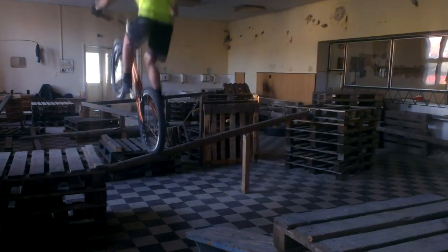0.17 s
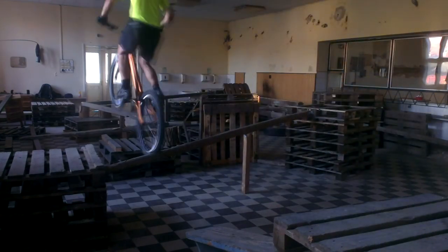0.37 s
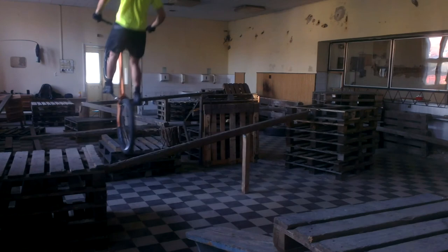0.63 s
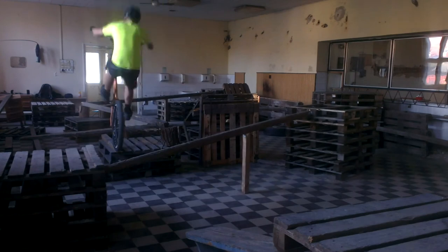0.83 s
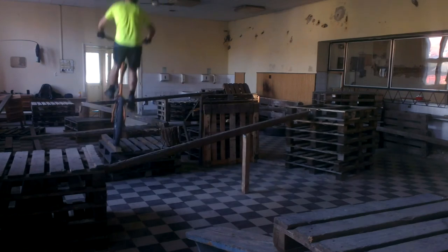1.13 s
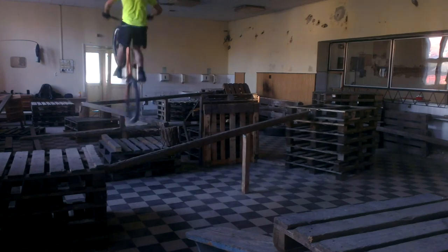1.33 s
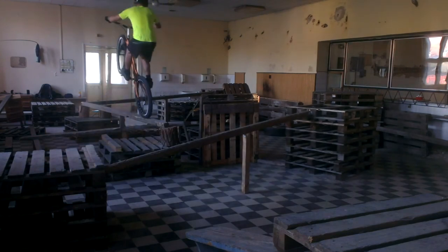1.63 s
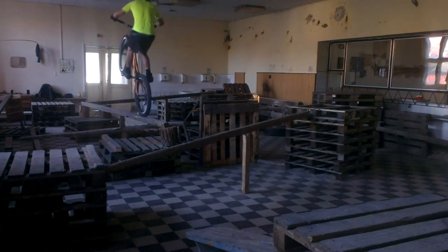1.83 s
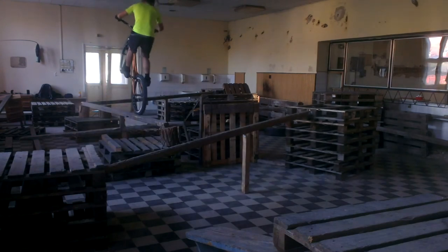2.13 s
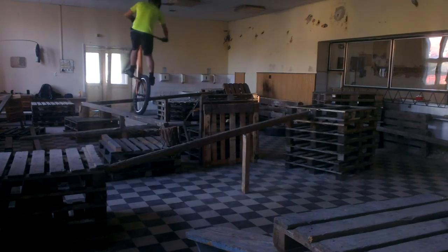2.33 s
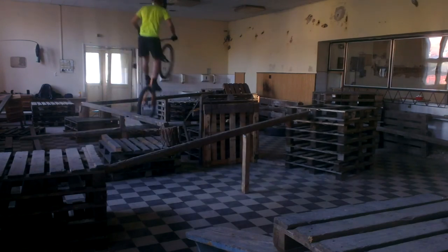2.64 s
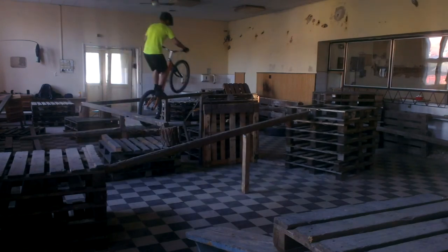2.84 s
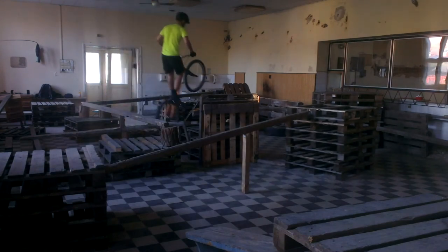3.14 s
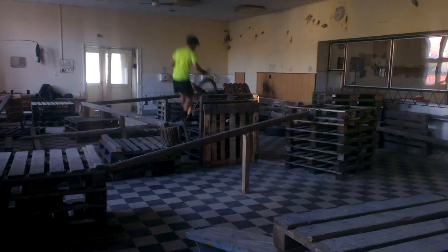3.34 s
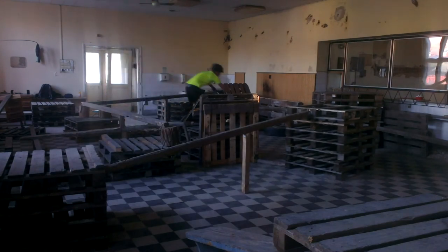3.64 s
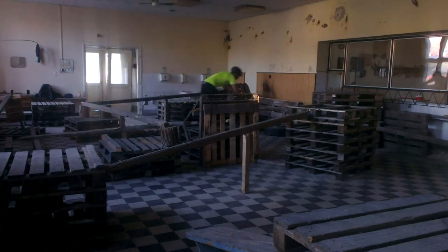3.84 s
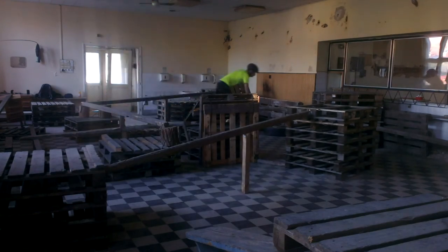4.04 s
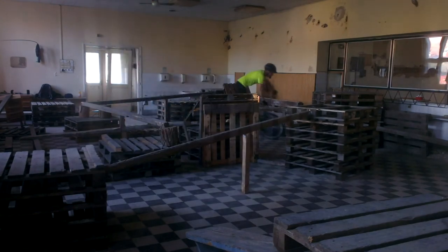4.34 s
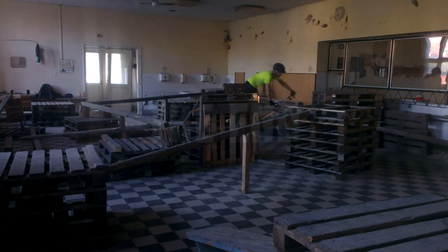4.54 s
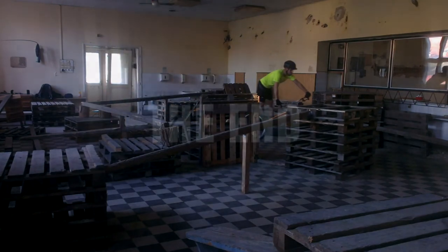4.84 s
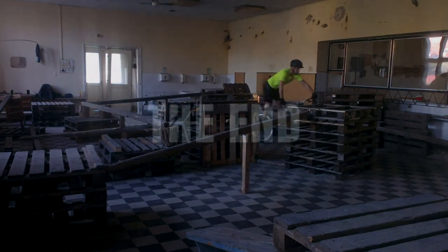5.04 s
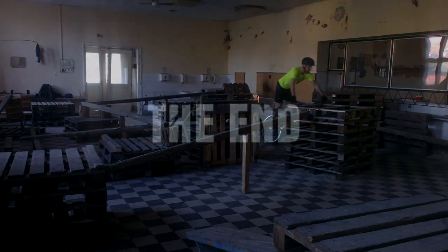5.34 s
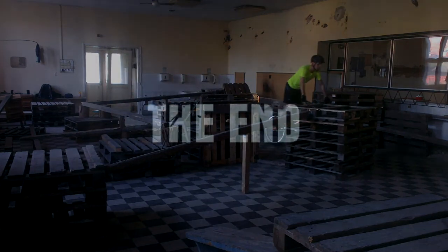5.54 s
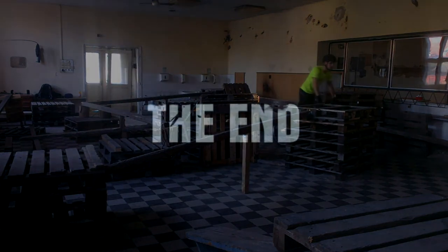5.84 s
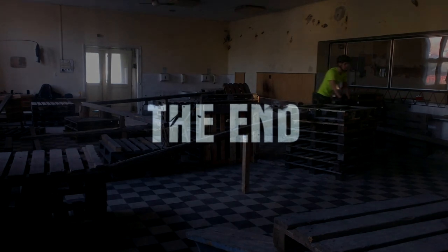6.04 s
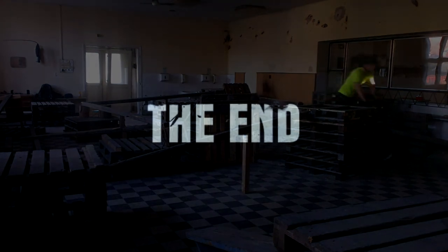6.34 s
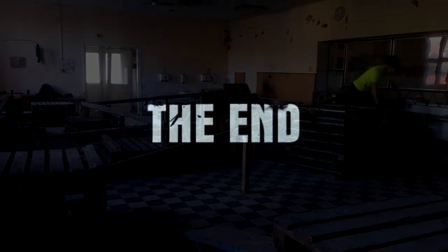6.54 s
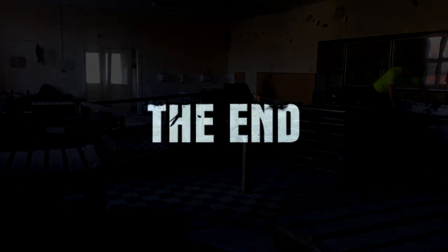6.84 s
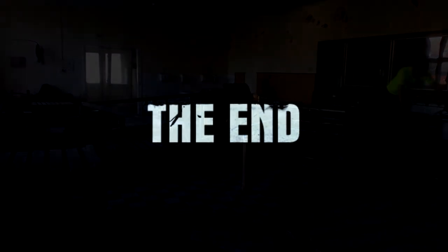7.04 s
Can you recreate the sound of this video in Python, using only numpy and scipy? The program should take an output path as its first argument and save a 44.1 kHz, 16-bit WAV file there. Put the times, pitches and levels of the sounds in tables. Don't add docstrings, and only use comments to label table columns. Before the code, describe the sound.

In a reverberant empty hall, a hopping bicycle gives brief brake shrieks, tyre thuds on planks, metallic ticks and faint freewheel buzz before quiet.

```python
import sys
import numpy as np
from scipy import signal
from scipy.fft import rfft, irfft, next_fast_len
from scipy.io import wavfile
from scipy.ndimage import uniform_filter1d

SR = 44100
rng = np.random.default_rng(int(sys.argv[2]) if len(sys.argv) > 2 else 0)


def dump(signal):
    limited = np.clip(np.atleast_2d(signal).T, -1, 1)
    pcm = np.round(limited * 32767).astype(np.int16)
    wavfile.write(sys.argv[1], SR, pcm)


def gain_from_db(level_db):
    decades = np.asarray(level_db, float) / 20
    return 10 ** decades


N = 317075


def at_hz(points, hz):
    table_hz, values = np.transpose(points)
    return np.interp(np.log(hz + 1), np.log(table_hz), values)


def drift(rate_hz, count):
    r = np.exp(-2 * np.pi * rate_hz / SR)
    slow = signal.lfilter([1], [1, -2 * r, r * r], rng.standard_normal(count + 4000))[4000:]
    return slow / slow.std()


def colour(x, spectrum):
    count = x.shape[-1]
    size = next_fast_len(count)
    gain = gain_from_db(at_hz(spectrum, np.fft.rfftfreq(size, 1 / SR)))
    return irfft(rfft(x, size) * gain, size)[..., :count]


def band_pass(x, low_hz, high_hz):
    return signal.sosfilt(signal.butter(2, [low_hz, high_hz], "band", fs=SR, output="sos"), x)


def split(x, hz):
    return [signal.sosfilt(signal.butter(4, hz, kind, fs=SR, output="sos"), x) for kind in ("low", "high")]


def evened(x, low_hz, high_hz, over_s):
    band = band_pass(x, low_hz, high_hz)
    power = (band.mean(axis=0) ** 2 + (band ** 2).mean(axis=0) / 2) / 2
    power = uniform_filter1d(power, int(over_s * SR))
    power = uniform_filter1d(power, int(over_s * SR / 2))
    return x / np.sqrt(np.maximum(power, 0) + 1e-9 * power.max())


def swell(clock, start, peak_db, rise_s, stop, fall_db_s):
    since = np.maximum(clock - start, 0)
    edge = np.clip(since / .004, 0, 1)
    rise_db = -24 * np.exp(-since / rise_s)
    return edge * gain_from_db(peak_db + rise_db - fall_db_s * np.maximum(clock - stop, 0))


# start_s, cut_db, over_s
TURN_DOWNS = [
    (.99, 6.5, 0.036),
    (1.8, 9, 0.025),
    (2.343, 12.5, 0.045),
    (3.51, 5, 0.014),
    (4.36, 14.5, 0.12),
]


def ducked(clock, start):
    cuts = [cut_db * np.clip((clock - s) / over_s, 0, 1) for s, cut_db, over_s in TURN_DOWNS if s > start]
    return gain_from_db(-sum(cuts))


# pitch_hz, fall_by_60_db_s
RING_TIME = [(200, 1.8), (1000, 1.2), (3000, 1.6), (6000, 0.94), (10000, 0.41), (15000, 0.086)]
# pitch_hz, likeness (0 to 1)
LIKENESS = [(200, 0.74), (700, 0.45), (1500, 0.067), (5000, .15), (12000, 0.31)]
# pitch_hz, left_over_right_db
LEFT_LEAN = [(500, 1.65), (4000, -.5), (8000, 0), (15000, 16)]


def hall(stretch, direct_db):
    t = np.arange(SR * 3 // 2) / SR
    edges = 120 * 2 ** np.arange(0, 7.1, .5)
    white = rng.standard_normal((2, 2, len(t)))
    bands, decays = [], []
    for k, (low, high) in enumerate(zip(edges, edges[1:])):
        mid, side = band_pass(white[k % 2], low, high)
        hz = np.sqrt(low * high)
        alike = np.clip(at_hz(LIKENESS, hz), 0, 1)
        lean_db = at_hz(LEFT_LEAN, hz) / 2
        stereo = np.sqrt(1 + alike) * mid + np.sqrt(1 - alike) * side * [[1], [-1]]
        bands.append(stereo * gain_from_db([[lean_db], [-lean_db]]))
        decays.append(gain_from_db(-60 * t / (stretch * at_hz(RING_TIME, hz))))
    bands = np.array(bands)
    decays = np.array(decays) * (1 - np.exp(-t / 0.019))

    def echoes():
        shifted = np.roll(bands, rng.integers(len(t)), axis=2)
        out = np.einsum("bct,bt->ct", shifted, decays)
        out[:, 0] += gain_from_db(direct_db)
        return out
    return echoes


# pitch_hz, level_db (per Hz)
SNAP_TONE = [(88, -79.5), (150, -46.5), (332, -24.5), (499, -23.5), (550, -19), (1240, -13.5),
             (1340, -12.5), (2020, -19), (3540, -1.5), (4130, -7.5), (6580, -7), (8630, -0.5), (10700, -5),
             (14300, -16), (15400, -61.5)]
# start_s, swell_s, stop_s, level_db, fall_db_per_s
SPINS = [(.09, 0.011, .31, -68, 93), (0.374, .02, 0.68, -42.5, 70), (0.738, .008, 0.66, -24.5, 122),
         (1.1, .08, 1.486, -48, 85), (1.495, .006, 1.418, -24.5, 138), (1.87, .03, 2.03, -53.5, 73),
         (2.499, .03, 2.626, -48.5, 50), (3.0, 0.03, 3.35, -50, 36), (3.72, .05, 4.33, -53.5, 67),
         (4.2, 0.063, 5.5, -54, 83), (6.08, .03, 6.18, -56, 12.5), (6.3, .04, 9.5, -50.5, 30)]
ROOM_TONE_DB = -67


def freewheel(clicks_per_s):
    teeth = np.cumsum(clicks_per_s * (1 + .05 * drift(3, N))) / SR
    passed = np.diff(np.floor(teeth), prepend=0) > 0
    snaps = passed * gain_from_db(2.5 * rng.standard_normal(N))
    snaps = snaps + gain_from_db(-15) * rng.standard_normal(N)
    lead = SR // 2
    snaps = np.concatenate([snaps[-lead:], snaps])
    echo = hall(stretch=.6, direct_db=5)()
    wet = signal.fftconvolve(colour(snaps, SNAP_TONE)[None], echo, axes=1)[:, lead:lead + N]
    clock = np.arange(N) / SR
    power = gain_from_db(2 * ROOM_TONE_DB)
    for s, rise_s, stop, level_db, fall_db_s in SPINS:
        power = power + swell(clock, s, level_db, rise_s, stop, fall_db_s) ** 2
    return evened(wet, 7000, 12000, over_s=0.11) * np.sqrt(power)


# start_s, level_db, pitch_hz
TICKS = [
    (.098, -46, 1440),
    (.384, -24.5, 6150),
    (0.387, -30, 7700),
    (0.426, -20.5, 7340),
    (0.432, -30, 1700),
    (2.154, -16, 4490),
    (4.2, -36, 4516),
    (2.156, -50, 423),
]


def ticks(echoes):
    t = np.arange(SR // 5) / SR
    out = np.zeros((2, N))
    for s, level_db, hz in TICKS:
        ring = np.sin(2 * np.pi * hz * t) * t * hz * np.exp(-t * hz * 1.4)
        snap = gain_from_db(level_db - 14) * ring
        first_echoes = echoes()[:, :len(t)] * np.exp(-t / 0.011)
        first = int(s * SR)
        heard = signal.fftconvolve(snap[None], first_echoes, axes=1)
        out[:, first:first + len(t)] += heard[:, :len(t)]
    return out


# start_s, length_s, blow_db, plank_ring_db
CONTACTS = [(0.099, 0.013, 2.5, -8), (0.343, 0.2, -11, -15), (0.423, 0.171, -12, 18.5),
            (0.714, 0.14, -13.5, 5.5), (1.13, 0.15, -18.5, 0), (1.485, 0.14, 2, 14.5),
            (2.055, 0.16, -1.5, -20), (2.664, 0.13, -10, 3), (3.327, 0.063, -13, -7.5),
            (3.703, 0.05, -16, -2), (3.945, 0.11, 2.5, -6)]
# scrape_db, thump_db, swell_s, fall_db_per_s
CONTACT_LOUDNESS = [(-64, -66.5, 0.0033, 21), (-41.5, -64, 0.041, 66), (-37, -39, 0.0185, 118),
                    (-33.5, -42, 0.029, 71), (-54, -66, 0.015, 56), (-34, -40.5, .03, 85),
                    (-44.5, -87, 0.029, 20.5), (-52, -57, 0.012, 26), (-42, -50, 0.0051, 69),
                    (-35, -50, 0.039, 130), (-41, -68, .008, 25)]
GRIT_DB = [3.5, -1, -4.5, -3.5, -0.8, 0, -1.5, 1, 0.1, 1.5, 3]
# pitch_hz, level_db (per Hz)
WOOD_TONE = [(150, -33), (300, -11), (500, -2.5), (800, 2.5), (1000, 13), (1600, 9), (2000, 3.5),
             (3200, 12.5), (4500, 0.5), (8000, 0), (13000, -41)]
PLANK_HZ, PLANK_WIDTH_HZ = 778, 59
GRIT_HZ, GRIT_FALL_DB_S = 2400, 25
ROLL_SCRAPE_DB, ROLL_THUMP_DB, ROLL_STOP_S, ROLL_FALL_DB_S = -64.5, -66.5, 4.42, 25


def scuffs(echoes):
    t, clock = np.arange(SR // 4) / SR, np.arange(N) / SR
    wet = gain_from_db(-29.5) * colour(rng.standard_normal((2, N)), WOOD_TONE)
    plank = signal.iirpeak(PLANK_HZ, PLANK_HZ / PLANK_WIDTH_HZ, fs=SR)
    for s, length, blow_db, ring_db in CONTACTS:
        strength = gain_from_db(2.4 * np.minimum(rng.exponential(1, len(t)), 5))
        struck = rng.random(len(t)) < 3000 / SR
        grains = rng.standard_normal(len(t)) * strength * struck
        press = np.clip(t / 0.0033, 0, 1) * np.clip((length - t) / 0.022, 0, 1)
        spray = grains * gain_from_db(blow_db) * press
        knock = colour(spray, WOOD_TONE) + gain_from_db(ring_db) * signal.lfilter(*plank, spray)
        heard = signal.fftconvolve(knock[None], echoes(), axes=1)
        first = int(s * SR)
        wet[:, first:first + heard.shape[1]] += heard

    roll = swell(clock, .1, 0, .2, ROLL_STOP_S, ROLL_FALL_DB_S)
    power = (roll * gain_from_db([[ROLL_SCRAPE_DB], [ROLL_THUMP_DB], [ROLL_SCRAPE_DB]])) ** 2
    extra_fall = np.array([[0], [0], [GRIT_FALL_DB_S]])
    for contact, loudness, grit_db in zip(CONTACTS, CONTACT_LOUDNESS, GRIT_DB):
        s, length = contact[:2]
        scrape_db, thump_db, rise_s, fall_db_s = loudness
        shape = swell(clock, s, 0, rise_s, s + length / 2, fall_db_s + extra_fall) * ducked(clock, s)
        power += (shape * gain_from_db([[scrape_db], [thump_db], [scrape_db + grit_db]])) ** 2
    scrape_gain, thump_gain, grit_gain = np.sqrt(power)

    thump, scrape = split(wet, 600)
    body, grit = split(evened(scrape, 1600, 2500, over_s=.04), GRIT_HZ)
    thump = evened(thump, 150, 850, over_s=0.068)
    return body * scrape_gain + grit * grit_gain + thump * thump_gain


# time_s, depth_db, width_s
CANCELLATIONS = [(.795, -2.5, 0.014), (.9, 6, .015), (.965, -4.5, .008), (1.04, 20, 0.0067),
                 (1.545, 33, 0.012), (1.606, 2, 0.0023), (2.148, 9.5, 0.022), (2.362, 1, 0.0045),
                 (3.468, 13, 0.022), (4.025, 6, 0.016), (4.087, 18.5, 0.0087), (4.146, 11.5, 0.029),
                 (4.2, 1.5, 0.0091), (4.3, 2.5, 0.044), (4.385, 9, 0.0066), (1.675, 16, 0.0041),
                 (2.285, -2, 0.022), (1.085, 8, 0.0089)]


def nulls(clock):
    return gain_from_db(-sum(depth_db * np.exp(-((clock - s) / width) ** 2) for s, depth_db, width in CANCELLATIONS))


# start_s, length_s, pitch_hz, wobble_share, extra_tilt_db_per_octave, left_over_right_db
GRABS = [
    (0.319, 0.095, 864, 0.02, -8.5, 2),
    (0.75, 0.1, 1089, 0.019, -3, -1),
    (1.504, 0.074, 1146, 0.023, -12.5, 2),
    (2.064, 0.084, 1098, 0.0079, 1.5, -0.5),
    (2.679, 0.054, 823, 0.034, 3.5, 0),
    (3.307, .07, 1090, .065, -5.5, 1.5),
    (3.709, 0.04, 1063, 0.069, -1, 0.5),
    (3.93, 0.12, 1119, 0.006, -1.1, 1.5),
    (2.888, .2, 805.4, .015, -4.5, 1),
]
# second_overtone_db, overtones_past_fourth_db, pad_rasp_db, starts_flat_share
GRAB_COLOUR = [(7, -12.5, -13, 0.016), (2, -5.5, -14, .03), (10.5, -5.5, -23, -.02), (2.2, -0.5, -29, .03),
               (0.95, -11, -12.5, -0.025), (-2.5, -13.5, -18, 0.067), (-4, -8.5, -9, -0.024),
               (-0.1, -0.5, -30.5, .012), (1.5, -6, -20.5, -0.045)]
# lowest_tone_db, overtones_db, swell_s, lowest_tone_fall_db_per_s, overtones_fall_db_per_s
GRAB_LOUDNESS = [(-41, -41, 0.0037, 43, 70), (-26, -25.5, 0.0017, 59, 86.5), (-18.5, -25, 0.002, 57.5, 76),
                 (-16, -16.5, 0.0084, 51, 76), (-54.5, -55, 0.03, 60.5, 40), (-30, -34, 0.0097, 60, 81),
                 (-38, -34, 0.013, 80.5, 90.5), (-12.5, -9.5, 0.011, 47.5, 81.5), (-60.5, -61, .01, 40, 60)]
# multiple_of_pitch, level_db
OVERTONES = [(1, -2), (2, -10.5), (3, -4.5), (4, -10), (5, -14), (6, -15), (7, -17), (8, -19.5), (9, -24.5),
             (10, -32.5), (11, -45), (12, -40), (13, -43)]
OVERTONE_LAG = 1.1
OVERTONE_DUCK = .4


def brake(echoes):
    out = np.zeros((2, N))
    multiple, level_db = np.transpose(OVERTONES)
    t = np.arange(SR // 4) / SR
    for grab, tone, loudness in zip(GRABS, GRAB_COLOUR, GRAB_LOUDNESS):
        s, length, hz, wobble, tilt_db, pan_db = grab
        second_db, top_db, rasp_db, flat = tone
        low_db, high_db, rise_s, low_fall, high_fall = loudness

        waver = drift(56, len(t))
        waver = waver - waver[:int(length * SR)].mean() + 1.4 * drift(560, len(t))
        pitch = hz * (1 + wobble * waver - flat * np.exp(-t / 0.018))
        pitch -= hz * 0.076 * np.clip(t / length, 0, 1) ** 7
        phase = 2 * np.pi * np.cumsum(pitch) / SR

        gain_db = level_db + tilt_db * np.log2(multiple)
        gain_db = gain_db + second_db * (multiple == 2) + top_db * (multiple > 4)
        begin = rng.uniform(0, 2 * np.pi, (len(multiple), 1))
        stack = gain_from_db(gain_db) @ np.sin(np.outer(multiple, phase) + begin)
        stack *= 1 + gain_from_db(rasp_db) * drift(2200, len(t))
        grip = np.clip(t / 0.0052, 0, 1) * np.clip((length - t) / .02, 0, 1)
        grip = grip * gain_from_db(3.0 * drift(40, len(t)))

        squeal = split(stack * grip, .7 * hz)[1]
        heard = signal.fftconvolve(squeal[None], echoes(), axes=1)
        low, high = split(heard, 1.403 * hz)
        first = int(s * SR)
        clock = s + np.arange(low.shape[1]) / SR
        duck = ducked(clock, s)
        low_gain = swell(clock, s, low_db, rise_s, s + length, low_fall) * duck * nulls(clock)
        high_gain = swell(clock, s, high_db, rise_s * OVERTONE_LAG, s + length / 2, high_fall)
        high_gain = high_gain * duck ** OVERTONE_DUCK
        wet = evened(low, 750, 1900, over_s=0.099) * low_gain
        wet = wet + evened(high, 1500, 4500, over_s=0.042) * high_gain
        out[:, first:first + wet.shape[1]] += wet * gain_from_db([[pan_db / 2], [-pan_db / 2]])
    return out


GATE_SHUT_S, GATE_OPEN_S, GATE_RISE_S = 5.39, 6.1, .012
GATE_FALL_DB_S, GATE_DEPTH_DB = 201, 38


def gate():
    clock = np.arange(N) / SR
    shut_db = np.clip(GATE_FALL_DB_S * (clock - GATE_SHUT_S), 0, GATE_DEPTH_DB)
    return gain_from_db(-shut_db * np.exp(-np.maximum(clock - GATE_OPEN_S, 0) / GATE_RISE_S))


def scene():
    echoes = hall(stretch=1.3, direct_db=30)
    return gate() * (freewheel(clicks_per_s=120) + ticks(echoes) + scuffs(echoes) + brake(echoes))


# pitch_hz, level_db (per Hz)
HISS_TONE = [(90, -43.5), (200, -13.5), (400, -8), (1000, 0), (1950, -9), (2900, 1), (4200, -7),
             (7000, -14.5), (10400, -20), (13000, -21), (15500, -28)]


def electronics():
    hiss = colour(rng.standard_normal((2, N)), HISS_TONE)
    whine = gain_from_db(-108) * np.sin(2 * np.pi * 12000 * np.arange(N) / SR)
    return gain_from_db(-79) * hiss / hiss.std() + whine


def roll_off(x):
    return signal.sosfilt(signal.butter(12, 15590, fs=SR, output="sos"), x)


def record(dry):
    thin = signal.sosfilt(signal.butter(3, 180, "high", fs=SR, output="sos"), dry)
    mix = np.clip(thin + electronics(), -1, 1)
    return roll_off(mix)


dry = scene()
out = record(dry)
dump(out)
```